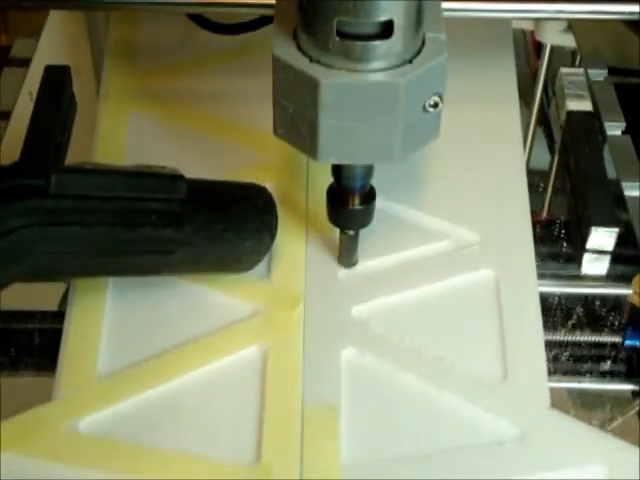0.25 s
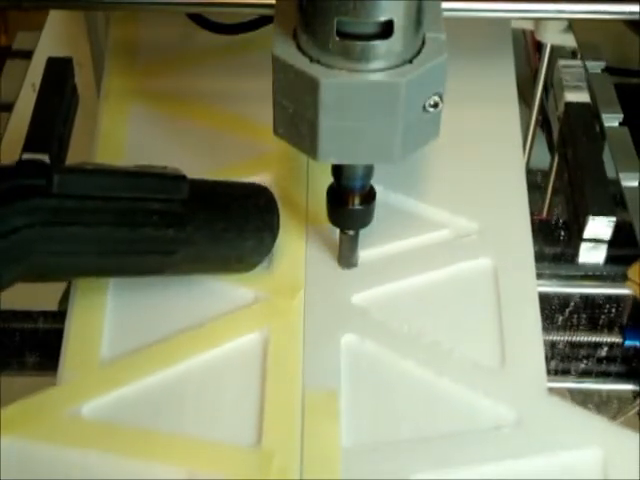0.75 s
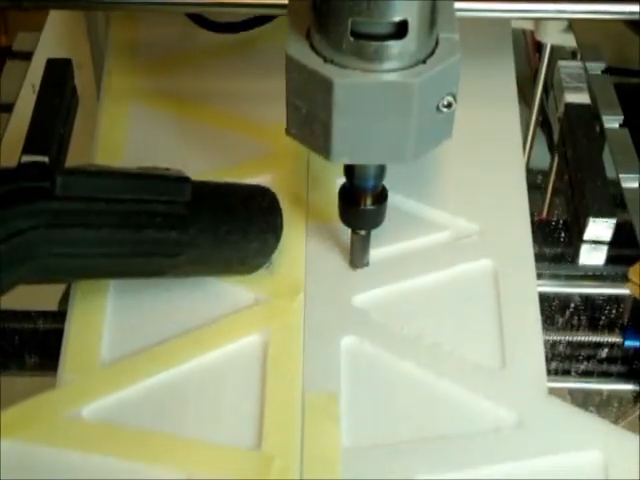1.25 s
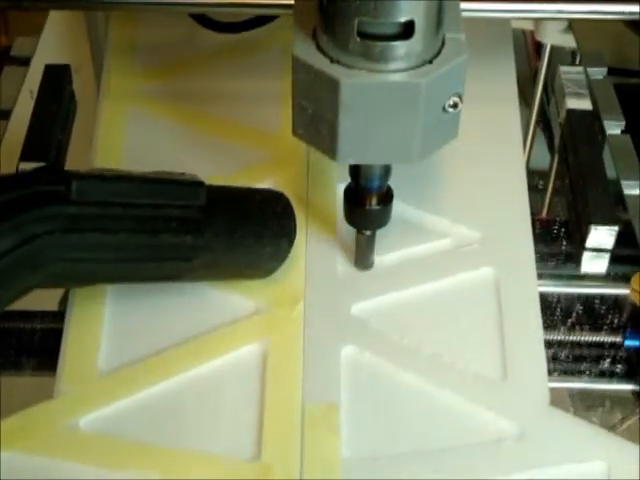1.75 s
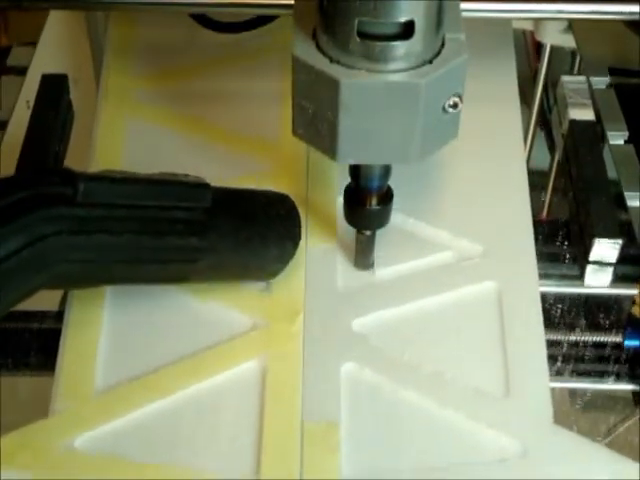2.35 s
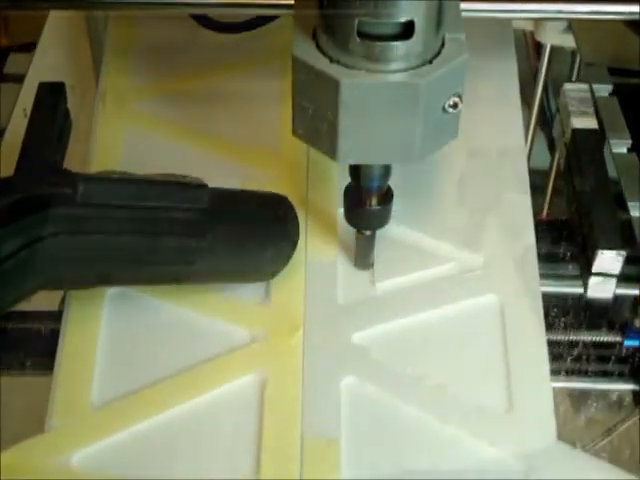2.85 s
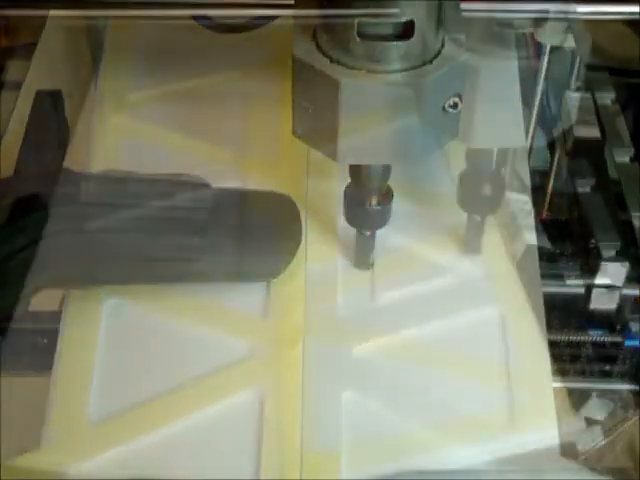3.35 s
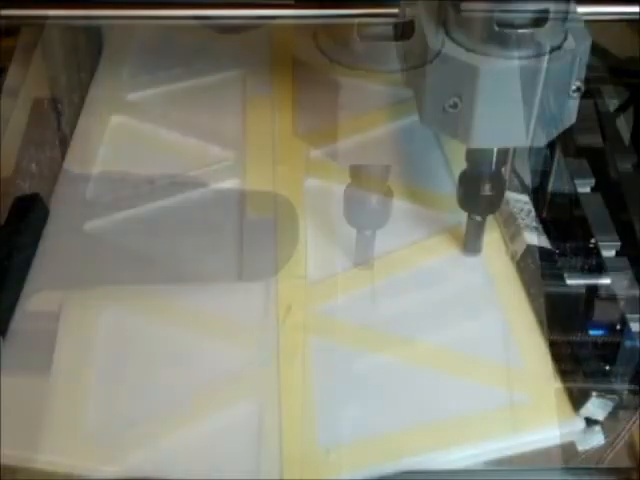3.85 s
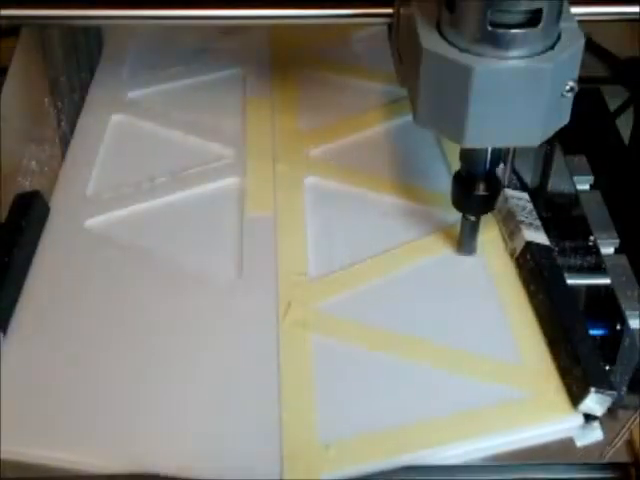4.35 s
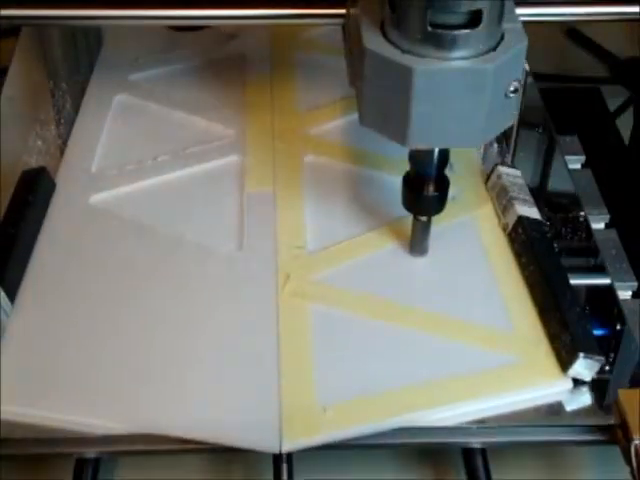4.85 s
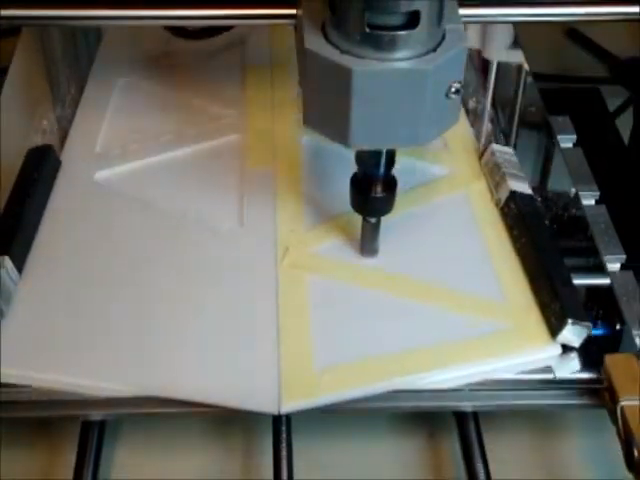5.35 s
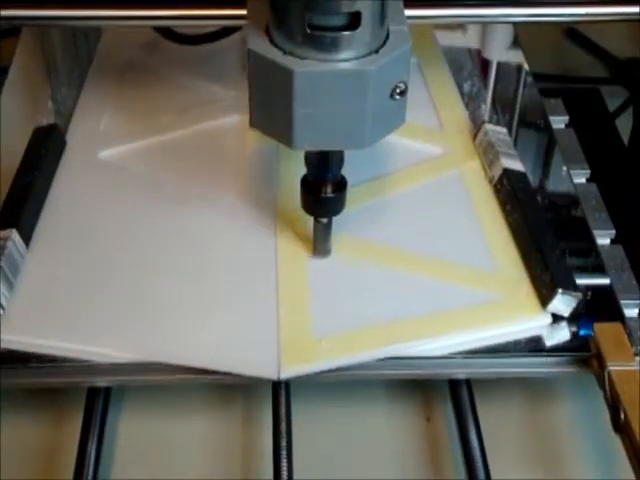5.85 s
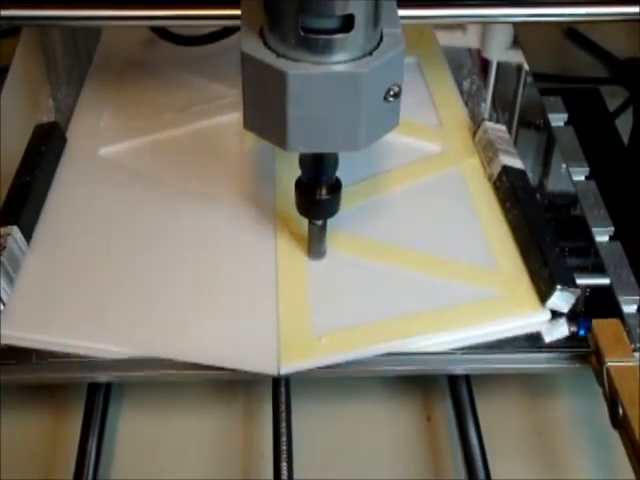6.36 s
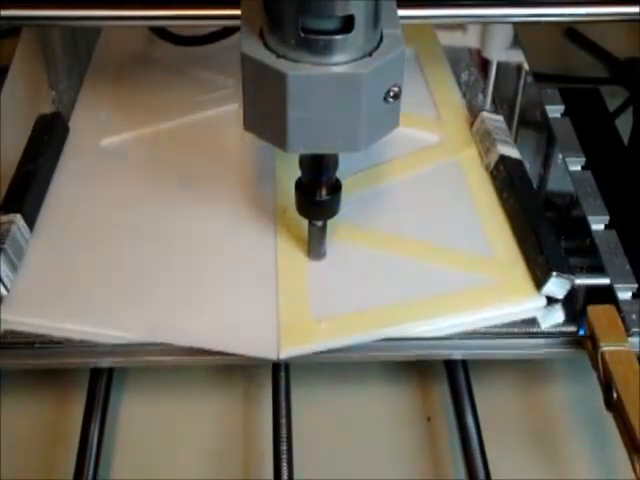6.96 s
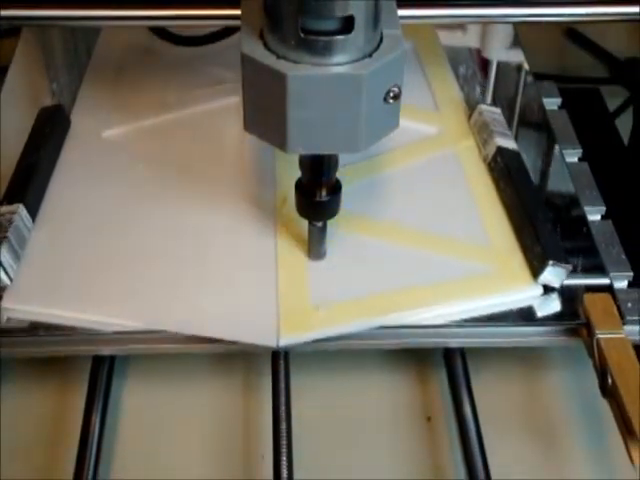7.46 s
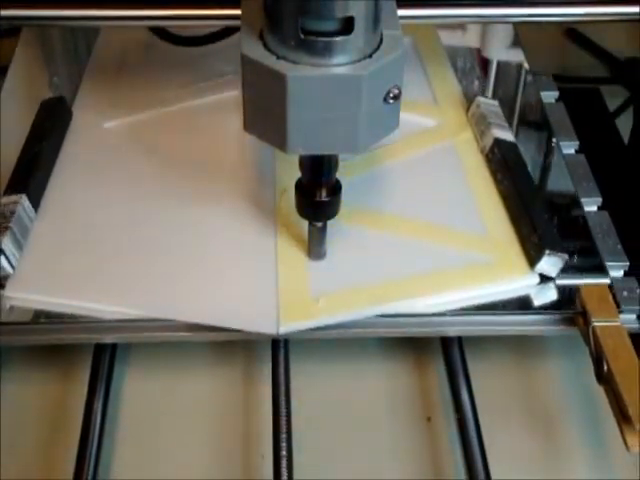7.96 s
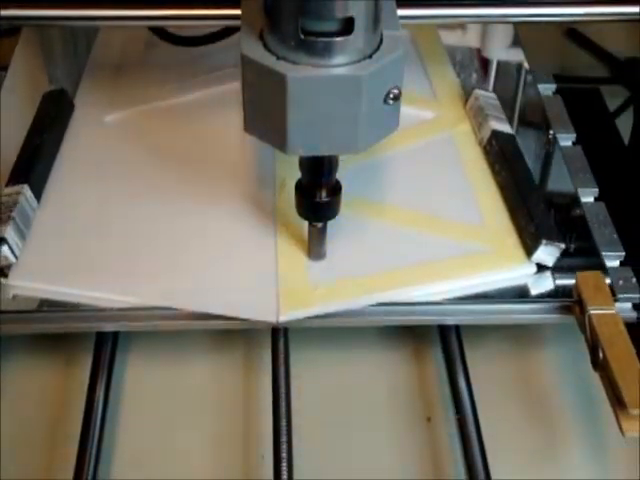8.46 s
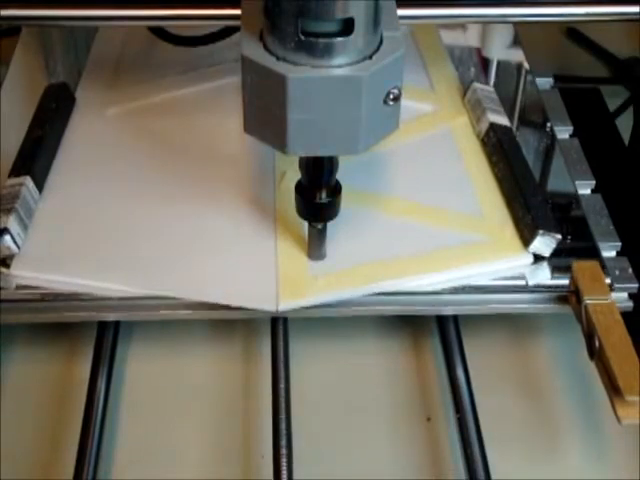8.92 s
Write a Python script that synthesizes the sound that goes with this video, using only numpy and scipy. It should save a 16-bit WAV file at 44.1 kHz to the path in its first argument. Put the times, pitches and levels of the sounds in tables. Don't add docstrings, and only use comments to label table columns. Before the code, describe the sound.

A continuous small-router whir in a home workshop, heard by one close, nearly mono microphone with gain control and a limited, slightly grainy top end. Broad rushing air, strongest in the midrange, surrounds thin, wavering shaft and bearing tones, a low rotational hum of about 233 hertz and a vacuum tone near 404. From 0 to 1.4 seconds the level wavers upward, with a short lull at 1.3, then drops abruptly near 1.45 and partly recovers by 2. Between 2.8 and 4 a similar whir cross-fades in, quiet and slightly beating around 3.5. At 4.45 a tiny rising chirp begins a faint stepper whine near 1750 hertz. The whir swells until 5.9, when a short falling squeak sounds. At 6.4 the cutter bites: a slight pitch sag and brief lull. Another small lull follows at 7.0; then steady, loud whirring continues to 9.2, cut off mid-run.

```python
import sys
import numpy as np
from scipy import signal
from scipy.fft import rfft, irfft
from scipy.io import wavfile
from scipy.ndimage import uniform_filter1d, minimum_filter1d

SR = 44100
rng = np.random.default_rng(int(sys.argv[2]) if len(sys.argv) > 2 else 0)


def output_pcm(signal):
    pcm = np.clip(np.atleast_2d(signal).T, -1, 1) * 32767
    wavfile.write(sys.argv[1], SR, np.round(pcm).astype(np.int16))


def boost(x):
    u = np.asarray(x, float) / 20
    return 10 ** u


N = 405279
T = np.arange(N) / SR
FREE_HZ = 233.85
EDGE_HZ = 10075



def columns(rows, t):
    s, *values = np.transpose(rows)
    return [np.interp(t, s, v) for v in values]


def drift(shape, sizes):
    z = rng.standard_normal(shape)
    for axis, size in enumerate(sizes):
        z = uniform_filter1d(uniform_filter1d(z, size, axis), size, axis)
    return z / z.std()


def wander(count, per_s, t=T):
    knots = np.arange(0, T[-1] + 1, 1 / (4 * per_s))
    return [np.interp(t, knots, z) for z in drift((len(knots), count), [4]).T]


def sine(hz, db):
    turns = np.cumsum(hz * np.ones(N)) / SR + rng.random()
    return np.sqrt(2) * boost(db) * np.sin(2 * np.pi * turns)


def quick_sin(turns):
    return np.sin(2 * np.pi * (turns - np.floor(turns)).astype(np.float32))


# (time [s], power share of the second moment [0-1], travel toward the microphone [0-1])
POSE = [(0, 0, 0), (2.95, 0.06, 0.47), (3.5, 0.5, 0), (4.2, 0.77, 0), (5.1, 1, 0.31), (5.9, 0.96, 0.8),
        (6.5, 1, 0.81), (9.19, 0.75, 1)]


def head(t):
    return [np.clip(c, 0, 1) for c in columns(POSE, t)]


def placed(levels, t):
    share, travel = head(t)
    left, far, near = levels
    return left + share * (far + travel * (near - far) - left)


# (start [s], end [s])
FADE_S = (2.76, 4)


def crossfade(levels, roar_db, change_first_db=0, change_second_db=0):
    u = np.pi / 2 * np.clip((T - FADE_S[0]) / (FADE_S[1] - FADE_S[0]), 0, 1)
    left, far, near = levels
    first_db = left + change_first_db
    second_db = far + head(T)[1] * (near - far) + change_second_db
    return np.cos(u) * boost(roar_db + first_db), np.sin(u) * boost(roar_db + second_db)


# (time [s], speed [turns per s])
SPEED_FIRST = [(0, 232.5), (0.27, 232.48), (0.64, 233.85), (1.47, 233.86), (1.7, 233.08), (2.25, 232.72),
               (3, 232.74), (3.27, 232.55), (4.3, 232.52)]
SPEED_SECOND = [(2.9, 233.82), (6.33, 233.88), (6.38, 233.04), (6.62, 233.33), (7.2, 233.04),
                (7.95, 233.06), (8.5, 232.96), (8.85, 232.64), (9.19, 232.74)]


def spindle_speeds(jitter=.00025):
    tables = SPEED_FIRST, SPEED_SECOND
    return [columns(table, T)[0] * (1 + jitter * w) for table, w in zip(tables, wander(2, 12))]


# (left [dB], far right [dB], near [dB])
LOW_SHAFT = [2, 4, 5]
LOW_DB = [(-28, -36, -38), (-25, -29, -26), (-25, -25, -32)]
SHAFT = [10.0, 15.0, 20.0, 22.0, 25.0, 26.0, 30.0, 34.0, 37.0, 38.0, 39.0, 40.0]
SHAFT_DB = [(-23.0, -21.0, -18.0), (-28.0, -24.0, -24.0), (-28.0, -30.0, -36.0), (-28.0, -45.0, -37.0),
            (-30.0, -28.0, -27.0), (-30.0, -26.0, -27.0), (-36.0, -44.0, -29.0), (-25.0, -39.0, -28.0),
            (-37.0, -38.0, -37.0), (-30.0, -34.0, -38.0), (-31.0, -32.0, -31.0), (-31.0, -41.0, -39.0)]
FRONT_BEARING = [14.652, 15.652, 26.305, 26.695, 26.914, 27.305, 28.305, 28.695, 28.914, 29.082, 29.305,
                 29.477, 29.695, 29.918, 30.305, 34.074, 37.461, 38.074, 38.684, 39.461, 40.074]
FRONT_DB = [(-27.0, -25.0, -19.0), (-31.0, -31.0, -23.0), (-30.0, -24.0, -23.0), (-30.0, -29.0, -36.0),
            (-29.0, -28.0, -37.0), (-24.0, -26.0, -36.0), (-30.0, -26.0, -29.0), (-19.0, -33.0, -25.0),
            (-30.0, -30.0, -31.0), (-29.0, -36.0, -38.0), (-25.0, -23.0, -25.0), (-26.0, -38.0, -34.0),
            (-27.0, -30.0, -28.0), (-29.0, -33.0, -39.0), (-29.0, -33.0, -32.0), (-29.0, -44.0, -34.0),
            (-39.0, -34.0, -34.0), (-29.0, -29.0, -30.0), (-36.0, -33.0, -34.0), (-36.0, -32.0, -35.0),
            (-34.0, -31.0, -37.0)]
REAR_BEARING = [26.422, 31.188, 31.801, 31.969, 32.191, 32.578, 33.188, 33.801, 34.578, 35.191, 35.961,
                38.852, 40.871, 41.566, 42.348, 42.57, 42.961]
REAR_DB = [(-32.0, -29.0, -28.0), (-27.0, -26.0, -38.0), (-30.0, -31.0, -40.0), (-28.0, -32.0, -33.0),
           (-30.0, -32.0, -35.0), (-20.0, -24.0, -30.0), (-29.0, -28.0, -31.0), (-27.0, -24.0, -33.0),
           (-28.0, -29.0, -31.0), (-33.0, -34.0, -36.0), (-29.0, -49.0, -44.0), (-39.0, -30.0, -38.0),
           (-27.0, -29.0, -36.0), (-27.0, -25.0, -32.0), (-24.0, -14.0, -23.0), (-30.0, -22.0, -30.0),
           (-30.0, -28.0, -27.0)]
# (multiple of the speed, start [s], end [s], level [dB])
SWELLS = [
    (10, 7.9, 9.5, 4),
    (35.961, 1.6, 5, -10),
    (14.652, 5.3, 6.6, 4),
    (41.566, 7.7, 9.5, 7),
    (42.348, 6.35, 9.5, -3),
    (42.961, 6.35, 8.5, 5),
    (42.961, 1.6, 2.6, 5),
    (32.578, 0, 1.5, 2),
]


def spindle(first, second, whirr_db, waver_db=2.5):
    orders = SHAFT + FRONT_BEARING + REAR_BEARING + LOW_SHAFT
    levels = SHAFT_DB + FRONT_DB + REAR_DB + LOW_DB
    slow = T[::256]
    share, travel = head(slow)
    turns_first, turns_second = np.cumsum([first, second], 1) / SR
    mix = np.interp(T, slow, share)
    a = slice(0, np.flatnonzero(mix < 1)[-1])
    b = slice(np.flatnonzero(mix > 0)[0], N)
    out = np.zeros(N)
    for k, (left, far, near), w in zip(orders, levels, wander(len(orders), 3, slow)):
        swell = sum(db * (slow > s0) * (slow < s1) for order, s0, s1, db in SWELLS if order == k)
        change_db = waver_db * w + uniform_filter1d(swell + 0 * slow, size=60)
        change_db = change_db + 2 * (k > 33)
        size_first = boost(left + change_db) * np.sqrt(1 - share)
        size_second = boost(far + travel * (near - far) + change_db) * np.sqrt(share)
        out[a] += np.interp(T[a], slow, size_first) * quick_sin(k * turns_first[a])
        out[b] += np.interp(T[b], slow, size_second) * quick_sin(k * turns_second[b] + k / (2 * np.pi))
    return out * boost(whirr_db + 5.5)


def unbalance(first, second, roar_db):
    opposed_s = 3.48
    turns = np.cumsum([first, second], 1) / SR
    turns = turns - turns[:, [round(opposed_s * SR)]]
    sag_db = 2 * (first - FREE_HZ)
    recede_db = -3 * np.maximum(T - 7.06, 0)
    gains = crossfade((-21, -15.5, -17.5), roar_db, sag_db, recede_db)
    shake_first, shake_second = gains * np.sin(2 * np.pi * turns)
    return np.sqrt(2) * (shake_first - shake_second)


# (time [s], level [dB])
LEVEL = [(0, -46), (0.25, -48.5), (0.6, -44.5), (1.05, -42), (1.42, -44), (1.46, -50), (1.68, -49.5),
         (2.05, -46.5), (2.6, -48), (3.45, -51), (4.2, -48), (4.93, -44), (5.03, -43), (5.9, -39.2),
         (6.5, -40), (9.19, -40.2)]
# (time [s], length [s], roar [dB], whirr [dB])
DUCKS = [
    (1.267, .16, -2, -2.5),
    (1.6, .12, -2, -3.5),
    (6.383, .14, -2.5, -1.3),
    (7.02, .2, -2.5, -1.3),
]
# (left [dB], far right [dB], near [dB])
ROAR_DB = (-1.84, -2, -2)


def air(t):
    level = columns(LEVEL, t)[0]
    shapes = [np.cos(np.pi * np.clip((t - s) / length, -.5, .5)) ** 2 for s, length, *_ in DUCKS]
    roar_lull, whirr_lull = np.transpose(DUCKS)[2:] @ shapes
    bite_db = 2.5 * (FREE_HZ - columns(SPEED_SECOND, t)[0])
    bright_db = placed((-2.4, -0.1, -0.7), t) + bite_db - 0.76 * whirr_lull
    return level + placed(ROAR_DB, t) + roar_lull, level + whirr_lull, bright_db


HOP = 1024


def coloured(table, t, hz, band, field_db):
    share, travel = (c[:, None] for c in head(t))
    left, far, near = columns(table, hz)
    power = (1 - share) * boost(2 * left) + share * boost(2 * (far + travel * (near - far)))
    power *= band
    size = np.sqrt(power / power.sum(1, keepdims=True)) * boost(field_db)
    z = size * (rng.standard_normal(size.shape) + 1j * rng.standard_normal(size.shape))
    x = signal.istft(z.T, nperseg=4 * HOP, noverlap=3 * HOP)[1][2 * HOP:][:N]
    return x / x.std()


# (pitch [Hz], left [dB], far right [dB], near [dB])
ROAR = [(30, -31, -30.5, -37), (85, -24.5, -25, -38), (125, -27, -24, -29), (173, -13, -16, -17),
        (280, -8.5, -9.5, -9.5), (334, -10.5, -9, -13), (412, 0, 1.5, 0.5), (502, 5.5, 4.5, 3),
        (650, 9.5, 6.5, 9), (806, 7, 6, 4.5), (906, 7.5, 3, 8), (1117, 13.5, 10, 8), (1278, 7.5, 6, 4.5),
        (1543, 2, 1.5, -4.5)]
WHIRR = [(1635, 0, 1.5, 2), (1980, -1.5, -2.5, -1.5), (2737, 0.5, 4.5, 5), (2880, -4, -2, -1.5),
         (3670, 0.5, -1.5, 3.5), (4350, -5.5, -3.5, -5), (4730, -6, -3.5, -0.5), (5390, -5.5, -7.5, -4),
         (6280, -1.5, -2, -1.5), (6790, -2.5, -6, -8.5), (7770, -3, -8, -4), (8730, -7.5, -11.5, -13.5),
         (10000, -4.5, -1, -8.5), (10270, -37, -32, -22)]
# (pitch [Hz], width [Hz], level [dB])
ROOM = [(450, 30, -5), (484, 16, -5), (550, 24, -5), (618, 24, 2.5), (692, 20, -3), (718, 14, -4),
        (785, 24, -3), (890, 36, -4.5), (934, 22, 3), (975, 36, -4), (1078, 22, -5), (1106, 20, 2.5),
        (1148, 36, -3.5), (1226, 16, -4)]
# (pitch [Hz], width [Hz], level [dB])
HOUSING = [(1620, 70, 2), (2330, 120, -1), (2720, 130, 0), (3470, 100, -0.5), (3900, 150, 0.5),
           (6000, 100, 5), (6560, 300, 1.5), (8240, 170, -0.5), (9500, 270, 4)]


def airflow(roar_db, whirr_db, ripple_db=1.5, patchy_db=0.5, flicker_db=0.0):
    split_hz = 1500
    frames, hz = N // HOP + 6, np.fft.rfftfreq(4 * HOP, 1 / SR)
    t = (np.arange(frames) - 2) * HOP / SR
    ripple = ripple_db * drift((frames, len(hz)), [40, 2])
    field = ripple + patchy_db * drift((frames, len(hz)), [3, 30])
    field = field + sum(db / (1 + (2 * (hz - f) / width) ** 2) for f, width, db in ROOM + HOUSING)
    tilt = air(t)[2][:, None] * np.clip((hz - 4000) / 3000, 0, 1)
    low, high = hz < split_hz, (hz >= split_hz) & (hz < EDGE_HZ + 385)
    roar = boost(roar_db - 0.08) * coloured(ROAR, t, hz, low, field)
    whirr = boost(whirr_db - 0.6) * coloured(WHIRR, t, hz, high, field + tilt)
    return (roar + whirr) * boost(flicker_db * wander(1, 30)[0])


# (left [dB], far right [dB], near [dB])
FAN_DB = [
    (-11, -32, -18),
    (-20, -16, -19),
    (-18, -36, -23),
]


def vacuum(roar_db, waver_db=2.2, flutter_db=1.2):
    wobble, *waver = wander(4, 5)
    hz = 404.1 + .5 * wobble
    flutter = flutter_db * wander(1, 14)[0]
    patchy_db = waver_db * waver[2]
    out = sine(hz, 0) * sum(crossfade(FAN_DB[0], roar_db, flutter, patchy_db))
    for k, db, w in zip((2, 6), FAN_DB[1:], waver):
        out += sine(k * hz, .7 * waver_db * w) * np.hypot(*crossfade(db, roar_db))
    return out


# (time [s], pitch [Hz], level [dB])
SLOW_AXIS = [(3.0, 116.8, -108), (3.25, 116.8, -91), (4.2, 116.8, -85), (4.35, 116.8, -89),
             (4.55, 116.8, -108)]
FAST_AXIS = [(4.4, 1740, -80), (4.55, 1745, -62), (4.8, 1752, -63), (5.2, 1762, -67), (6.3, 1766, -63),
             (8, 1769, -60), (9.19, 1770, -62)]
# (time [s], length [s], start pitch [Hz], end pitch [Hz], level [dB])
SQUEAKS = [
    (4.452, .04, 1440, 1580, -49),
    (5.9, .038, 1630, 1350, -43),
    (5.912, .022, 1170, 1090, -42),
]


def axes(wobble_hz=4.0, waver_db=2.5):
    wobble, waver = wander(2, 20)
    hz, db = columns(FAST_AXIS, T)
    out = sine(hz + wobble_hz * wobble, db + waver_db * waver) * (T > FAST_AXIS[0][0])
    out += sine(*columns(SLOW_AXIS, T)) * (T > SLOW_AXIS[0][0]) * (T < SLOW_AXIS[-1][0])
    for s, length, start_hz, end_hz, db in SQUEAKS:
        u = np.clip((T - s) / length, 0, 1)
        out += sine(start_hz + (end_hz - start_hz) * u, db) * np.sin(np.pi * u)
    return out


# (pitch [Hz], level [dB])
MAINS = [
    (100, -94),
    (200, -81),
]


def mains_hum(roar_db):
    return sum(sine(f, db + roar_db + 46.5) for f, db in MAINS) * head(T)[1]


def starved(x, from_hz=5000, under=.185):
    hz, _, z = signal.stft(x, SR, nperseg=256, noverlap=192)
    z = z[:-3]
    band = (abs(z) ** 2).reshape(-1, 3, z.shape[1]).sum(1)
    band = uniform_filter1d(band, size=2, axis=1)
    weak = band < under * uniform_filter1d(band, size=200, axis=1)
    kept = minimum_filter1d(1. - weak, size=4, axis=1).repeat(3, axis=0)
    z = np.where(hz[:-3, None] > from_hz, z * kept, z)
    return signal.istft(np.pad(z, [(0, 3), (0, 0)]), SR, nperseg=256, noverlap=192)[1][:N]


# (time [s], low edge [Hz], high edge [Hz])
SWAPS = [(1.049, 4600, 5720), (2.163, 4170, 5200), (3.766, 6220, 7630), (3.928, 8220, 9700),
         (6.343, 4170, 5200), (6.691, 4170, 5200), (6.97, 4170, 5720), (7.434, 6220, 7630),
         (8.41, 5620, 7630), (8.804, 5620, 7630), (8.804, 8220, 9700)]


def swapped(x, length=1500, side_db=0):
    out = np.tile(x, (2, 1))
    hz, window = np.fft.rfftfreq(length, 1 / SR), np.hanning(length) ** .5
    for s, low_hz, high_hz in SWAPS:
        at = round(s * SR) - length // 2
        z = rfft(x[at:at + length] * window) * (hz > low_hz) * (hz < high_hz)
        size = np.sqrt((abs(z) ** 2).sum() / (z != 0).sum()) * (z != 0)
        side = irfft(size * np.exp(2j * np.pi * rng.random(len(z))))
        change = boost(side_db) * np.array([side, -side]) - .25 * irfft(z)
        out[:, at:at + length] += window * change
    return out


def scene():
    roar_db, whirr_db, _ = air(T)
    first, second = spindle_speeds()
    tool = spindle(first, second, whirr_db) + unbalance(first, second, roar_db)
    mono = tool + airflow(roar_db, whirr_db) + vacuum(roar_db) + axes() + mains_hum(roar_db)
    return np.tile(mono, (2, 1))


def top_cut(x):
    return signal.sosfilt(signal.butter(12, 10900, fs=SR, output="sos"), x)


def record(dry, mirror_db=-4.0):
    sampling_hz = 20000
    mirrored = dry[0] * (1 + 2 * boost(mirror_db) * np.cos(2 * np.pi * sampling_hz * T))
    edge = signal.firwin(901, EDGE_HZ, window=("kaiser", 9), fs=SR)
    narrow = signal.oaconvolve(starved(mirrored), edge, "same")
    return top_cut(swapped(narrow))


dry = scene()
out = record(dry)
output_pcm(out)
```